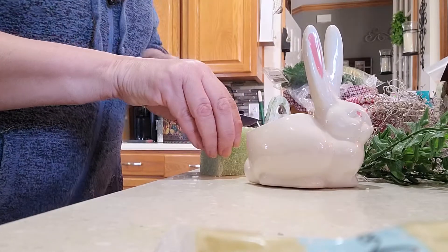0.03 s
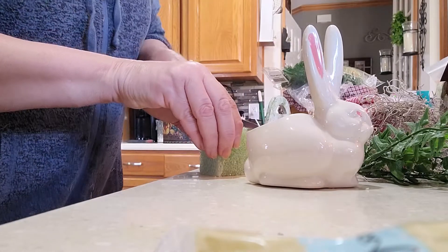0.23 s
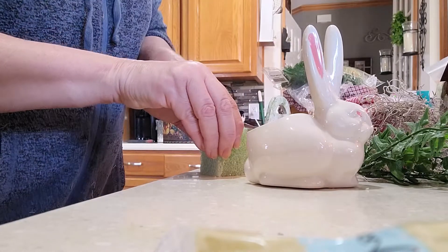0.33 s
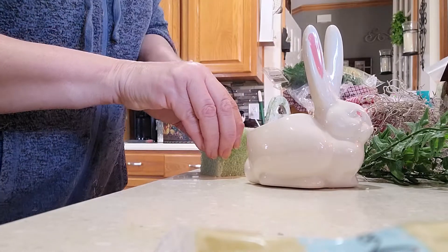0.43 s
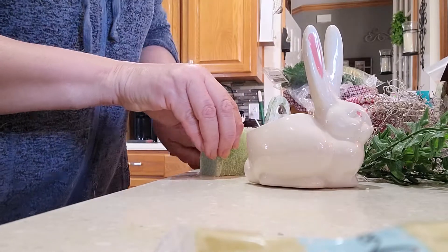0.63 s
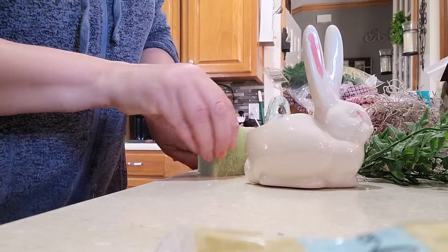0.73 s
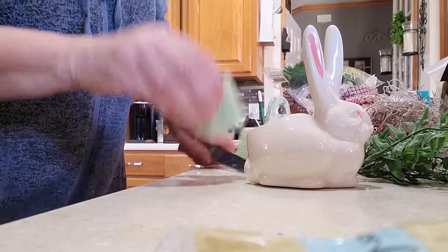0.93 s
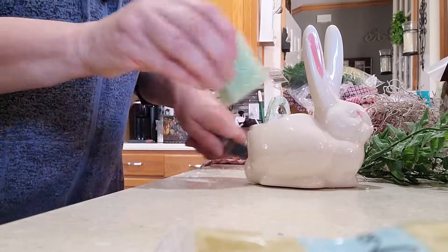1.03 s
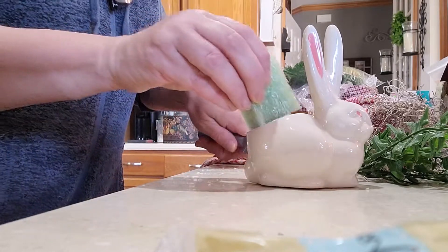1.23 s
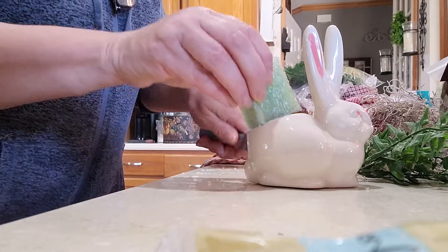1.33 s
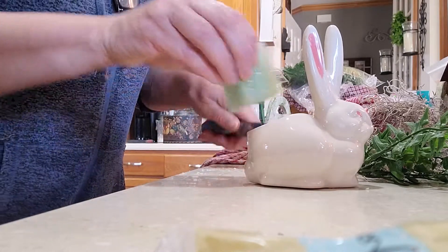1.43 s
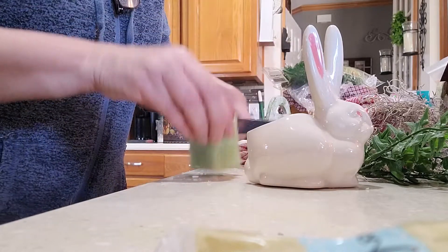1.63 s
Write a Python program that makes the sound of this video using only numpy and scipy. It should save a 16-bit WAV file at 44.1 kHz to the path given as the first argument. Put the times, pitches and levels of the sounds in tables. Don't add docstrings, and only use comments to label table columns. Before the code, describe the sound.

Dry floral foam is cut with a knife, crunching and snapping until the blade knocks the counter

```python
import sys
import numpy as np
from scipy import signal
from scipy.fft import rfft, irfft, next_fast_len
from scipy.io import wavfile

SR = 44100
rng = np.random.default_rng(int(sys.argv[2]) if len(sys.argv) > 2 else 0)


def magnitude_from_level(level_db):
    exponent = np.asarray(level_db, float) / 20
    return 10 ** exponent


def master_out(mix):
    frames = np.transpose(np.atleast_2d(mix))
    ceiling = np.clip(frames, -1, 1)
    pcm = np.round(ceiling * 32767).astype(np.int16)
    wavfile.write(sys.argv[1], SR, pcm)


N = 74970


def clock():
    return np.arange(N) / SR


def white(channels=2):
    return rng.standard_normal((channels, N))


def rms_one(x):
    return x / np.sqrt(np.mean(x ** 2) + 1e-20)


def passed(x, order, hz, kind):
    return signal.sosfilt(signal.butter(order, hz, kind, fs=SR, output="sos"), x)


def curve_db(rows):
    return np.interp(clock(), *np.transpose(rows))


def at_hz(points, hz):
    table_hz, table_db = np.transpose(points)
    return np.interp(np.log(hz + 1), np.log(table_hz), table_db)


def colour(x, spectrum):
    cepstrum = irfft(at_hz(spectrum, np.fft.rfftfreq(4096, 1 / SR)) * np.log(10) / 20)
    cepstrum[1:2048] *= 2
    cepstrum[2049:] = 0
    kernel = irfft(np.exp(rfft(cepstrum)))
    kernel = kernel / np.sqrt(np.sum(kernel ** 2))
    return signal.fftconvolve(x, kernel[None])[:, :N]


def drift(rate_hz):
    r = np.exp(-2 * np.pi * rate_hz / SR)
    chance = signal.lfilter([1], [1, -2 * r, r * r], rng.standard_normal(N + SR))
    return rms_one(chance[SR:])


def ring(force, hz, t60):
    r, w = magnitude_from_level(-60 / (t60 * SR)), 2 * np.pi * hz / SR
    return signal.lfilter([0, np.sin(w)], [1, -2 * r * np.cos(w), r * r], force + 1e-18)


def burst(s, db, rise, t60):
    t = np.maximum(clock() - s, 0)
    return magnitude_from_level(db - 60 * t / t60) * np.minimum(t / rise, 1)


def click(s, size):
    return size * (np.arange(N) == int(s * SR))


# frequency in Hz, level in dB per Hz.
AIR_SPECTRUM = [(30, -2.5), (100, -6.5), (450, -14), (700, -12), (1100, -20), (2000, -22.5), (3000, -39.5),
                (5000, -20.5), (16000, -25.5)]
# time in seconds, level in dB.
AIR_LEVEL = [(0, -63), (.04, -62.5), (.11, -62), (.2, -61.5), (.85, -59.5), (.93, -60.5), (.97, -71),
             (1.02, -68.5), (1.1, -64), (1.2, -65), (1.302, -71.5), (1.45, -66.5), (1.52, -66),
             (1.62, -71.5), (1.7, -81.5)]
# time in seconds, level in dB.
SLEEVE_LEVEL = [(0, -86), (.1, -88), (.9, -75), (1.0, -77.5), (1.1, -66.5), (1.2, -74.5), (1.239, -91),
                (1.5, -87.5), (1.56, -75), (1.62, -95), (1.7, -96.5)]
SLEEVE_BAND = [2000, 4173]
AIR_EDGES = [25, 150, 400, 800, 1400, 2200, 3300, 4800, 6500, 8500, 11000, 14000, 18000]
# frequency in Hz, level in dB.
DRONE = [(52, -72.5), (121, -76.5)]


def air():
    noise = white(3)
    mixed = noise[:2] + 0.36 * noise[2]
    patchy = 0
    for k, edges in enumerate(zip(AIR_EDGES, AIR_EDGES[1:])):
        patchy = patchy + passed(mixed, 2, edges, "band") * magnitude_from_level(6 * drift(9.2)) * (-1) ** k
    tone = colour(patchy, AIR_SPECTRUM) * magnitude_from_level(curve_db(AIR_LEVEL))
    cloth = rms_one(passed(white(), 2, SLEEVE_BAND, "band"))
    cloth = cloth * magnitude_from_level(curve_db(SLEEVE_LEVEL) + 1.2 * drift(40))
    hum_source = noise[:2] + 0.5 * noise[2]
    drone = sum(rms_one(ring(hum_source, hz, 0.9)) * magnitude_from_level(db) for hz, db in DRONE)
    return tone + cloth + drone


# time in seconds, level in dB.
RUMBLE_LEVEL = [(0, -54), (.2, -57.5), (.58, -41), (.8, -64.5), (0.949, -85), (1.4, -80), (1.55, -58.5),
                (1.7, -80)]
RUMBLE_BAND = [38, 70]


def rumble():
    noise = white(3)
    low = passed(noise[:2] + noise[2], 2, RUMBLE_BAND, "band")
    return rms_one(low) * magnitude_from_level(curve_db(RUMBLE_LEVEL))


def kitchen(x):
    t60, wall_cut_hz = 0.21, 4160
    size = next_fast_len(N + SR)
    hz = np.fft.rfftfreq(size, 1 / SR)
    response = np.zeros((2, size // 2 + 1), complex)
    for k, lag in enumerate(rng.uniform(.004, .03, 16)):
        loop = magnitude_from_level(-60 * lag / t60) * np.exp(-2j * np.pi * hz * lag) / (1 + 1j * hz / wall_cut_hz)
        response[k % 2] += loop / (1 - loop) * (-1) ** (k // 2)
    return irfft(response * rfft(x, size), size)[:, :N]


def ports(pair, balance, lead_s):
    unlike_high, unlike_low, corner_hz = 0.47, 0.22, 2980
    hz = np.fft.rfftfreq(N, 1 / SR)
    share = np.clip((unlike_high * hz + unlike_low * corner_hz) / (hz + corner_hz), 0, 1)
    same, other = rfft(pair[0]) * np.sqrt(1 - share), rfft(pair[1]) * np.sqrt(share)
    tilt = magnitude_from_level(at_hz(balance, hz) / 2) * np.exp(1j * np.pi * hz * lead_s)
    return irfft([(same + other) * tilt, (same - other) / tilt], N)


# start in seconds, peak level in dB.
TICKS = [(0.0222, -41), (0.7256, -33), (0.7298, -33.5), (0.732, -35.5), (0.738, -39), (0.7404, -32),
         (0.7775, -33.5), (0.827, -49), (0.848, -50), (0.863, -36.5), (0.9694, -52.5)]
# start in seconds, peak level in dB.
CRUMBS = [(1.1615, -58), (1.1824, -52), (1.3042, -57), (1.3389, -72), (1.3558, -52), (1.369, -56.5),
          (1.425, -53), (1.443, -58), (1.47, -47), (1.5547, -46), (1.5994, -55), (1.679, -68)]
# frequency in Hz, level in dB per Hz.
TICK_SPECTRUM = [(470, -23.5), (800, -15), (2070, -5), (2950, -7), (9940, -6.5), (11000, -6), (16000, -8.5)]


def ticks():
    noise = white()
    cracks = noise * sum(burst(s, db + 1, 0.00027, 0.02) for s, db in TICKS)
    crumbs = noise * sum(burst(s, db + 1, 0.00027, 0.02) for s, db in CRUMBS)
    return colour(cracks, TICK_SPECTRUM) + passed(crumbs, 3, 4800, "high")


# frequency in Hz, level in dB, decay time t60 in seconds.
BLADE_MODES = [(727, -8, .04), (950, -9, .025), (1750, -25, .3), (2610, -2, .035), (2972, -2, .035),
               (4250, -17, .1), (4545, -3, .04), (6000, -9, .03), (6630, -11, .04), (7775, -13, .05),
               (9300, -18, .04), (11490, -2, .04), (12900, -14, .03), (14200, -10, .03)]


def brush():
    start, rise, fall, flick = 1.028, 0.02, 0.034, 1.0745
    t = clock() - start
    swell = np.minimum(t / rise, 1 - 0.85 * (t - rise) / fall)
    swell = np.clip(swell, 0, 1) ** 2 * (t < rise + fall)
    rub = white() * swell * magnitude_from_level(drift(75.4)) + click(flick, magnitude_from_level(7))
    rings = 0
    for k, (hz, db, t60) in enumerate(BLADE_MODES):
        rings = rings + ring(rub, hz, t60) * magnitude_from_level(db - 61.5) * (-1) ** k
    rings = rings + ring(rub * (clock() > 1.058), 4300, 0.021) * magnitude_from_level(-64)
    rings = rings + ring(click(flick, magnitude_from_level(-40.5)), 1720, .03)
    hiss = passed(rub, 2, 2500, "high") * magnitude_from_level(-45.5)
    return passed(rings + hiss, 4, 640, "high")


# start in seconds, peak level in dB.
TAPS = [(1.339, -46.5), (1.3558, -35), (1.3695, -34.5), (1.397, -30), (1.4184, -15.5), (1.4208, -24),
        (1.4264, -21.5), (1.431, -32), (1.444, -14.5), (1.451, -49), (1.4944, -24.5), (1.501, -22),
        (1.509, -21), (1.515, -47), (1.54, -32.5), (1.545, -31.5), (1.55, -35), (1.57, -39), (1.587, -44.5)]
# frequency in Hz, level in dB, decay time t60 in seconds.
VASE_MODES = [(214.7, -21, 0.25), (269.4, -9.5, 0.15), (304, -31, 0.13), (361, -5, 0.18),
              (506.4, -3.5, 0.09), (692, 3.5, 0.097), (904, 1, 0.034), (1228, 0, 0.032), (1665, 3.5, 0.025),
              (2310, -1.5, 0.13)]
# start in seconds, peak level in dB, frequency in Hz.
SIGHS = [
    (1.565, -38.5, 267),
    (1.586, -41, 261),
    (1.607, -43, 238),
    (1.629, -54.5, 225),
]


def vase():
    top_hz = 2900
    luck_db = rng.normal(0, 3, (len(TAPS), len(VASE_MODES)))
    side = .35 * rng.standard_normal(len(VASE_MODES))
    rattle = white() * sum(burst(s, db - 18, 0.00077, .05) for s, db in TAPS)
    out = passed(rattle, 3, 900, "low") * 4
    for s, db, hz in SIGHS:
        hum = burst(s, db, 0.0031, 0.082) * np.sin(2 * np.pi * hz * (clock() - s))
        out = out + hum * [[1], [.3]]
    for i, (s, db) in enumerate(TAPS):
        contact_s = 0.00025 * magnitude_from_level(-0.28 * (db + 28))
        t = np.maximum(clock() - s, 0) / contact_s
        push = -magnitude_from_level(db) * t ** 2 * np.exp(2 - 2 * t)
        rings = 0
        for k, (hz, level_db, t60) in enumerate(VASE_MODES):
            rings = rings + ring(push, hz, t60) * magnitude_from_level(level_db + luck_db[i, k]) * [[1], [side[k]]]
        out = out + magnitude_from_level(-3) * push * [[1], [0]] + magnitude_from_level(-19) * rings / (contact_s * SR * 2)
    return passed(passed(out, 3, top_hz, "low"), 2, [200, top_hz], "band")


# time in seconds, level in dB.
PRESSURE = [(0, -64), (0.118, -80.5), (0.126, -48), (0.2, -61), (0.204, -38), (.25, -34), (.3, -32),
            (0.341, -35), (.368, -39), (.378, -26.5), (0.441, -32), (0.464, -33.5), (0.48, -38),
            (0.484, -26), (.56, -24), (.6, -33.5), (0.651, -38.5), (0.748, -50), (0.799, -58.5),
            (0.928, -66.5)]


def pressure_db():
    s, db = np.transpose(PRESSURE)
    return np.interp(clock(), [*s, s[-1] + 0.028], [*db, db[-1] - 31])


# start in seconds, peak level in dB.
LANDING = [
    (.5647, -4.5),
    (.5656, -15),
    (.5674, -24),
    (.5691, -15.5),
    (.5724, -21),
]
# frequency in Hz, level in dB, decay time t60 in seconds.
COUNTER_MODES = [(80, -36, .2), (126, -27, .15), (246, -25, .1), (378, -29, .06), (690, -11, .04),
                 (800, -12, .03), (965, -8, .03), (1068, -9, .025), (1209, -3, .028), (1383, -2, .025),
                 (1660, -2, .025), (3490, 0, .015), (4600, 3, .015)]


def counter():
    luck_db = rng.normal(0, 1.8, (len(LANDING), len(COUNTER_MODES)))
    hit = 0
    for k, (hz, level_db, t60) in enumerate(COUNTER_MODES):
        blows = sum(click(s, magnitude_from_level(db + level_db + luck_db[i, k])) for i, (s, db) in enumerate(LANDING))
        pan = np.array([[1], [hz / 3500 - .5]])
        hit = hit + ring(blows, hz, min(t60, 30 / hz)) * (-1) ** k * pan
    shake = rms_one(passed(white(), 2, [70, 189], "band")) * [[1], [1.3]]
    return hit + shake * magnitude_from_level(-17 + 0.88 * pressure_db() + 3 * drift(60))


# frequency in
# Hz, level in dB, decay time t60 in seconds.
BODY_MODES = [(244.2, -39.5, 0.081), (361.7, -40.5, .05), (1250, -39.5, 0.069), (1670, -39, 0.092),
              (1950, -34, .015), (2350, -34.5, 0.059), (2670, -35, .035), (2887, -30, .025)]


def block(force, count):
    modes = enumerate(BODY_MODES[:count])
    return sum(ring(force, hz, t60) * magnitude_from_level(db) * (-1) ** k for k, (hz, db, t60) in modes)


# start in seconds, peak level in dB, body frequency in Hz.
SNAPS = [(0.0237, -34.5, 1510), (0.125, -15.5, 1460), (0.1333, -23, 2100), (0.181, -31.5, 2900),
         (0.2053, -27.5, 2300), (0.2079, -15.5, 2030), (0.2315, -16, 1960), (0.2344, -11, 2000),
         (0.261, -14, 2410), (0.2775, -11.5, 1796), (0.2975, -23.5, 2600), (0.3082, -12, 2350),
         (0.32, -26.5, 2500), (0.352, -26.5, 3300), (0.3738, -15.5, 2100), (0.3762, -13.5, 2750),
         (0.3843, -10, 2340), (0.389, -16, 1500), (0.3964, -8.5, 2600), (0.4071, -18, 2420),
         (0.4183, -19, 2500), (0.4255, -24.5, 2800), (0.43, -7, 2700), (0.44, -16, 2500),
         (0.4821, -6.5, 2040), (0.4845, -10, 1770), (0.4981, -11.5, 1900), (0.5082, -8.5, 2440),
         (0.5194, -14.5, 2000), (0.5214, -8, 2700), (0.528, -10.5, 2100), (0.554, -16, 4300),
         (0.6553, -24.5, 2980), (0.662, -11, 1670), (0.6636, -14, 3900), (.673, -21, 1458)]
# frequency in Hz, level in dB per Hz.
SNAP_SPECTRUM = [(240, -43), (400, -8), (719, -7.5), (2220, 1.5), (6340, -4.5), (7870, 2), (9040, -15),
                 (11200, -2.5), (16000, -10.5)]


def snaps():
    rise = .0003
    noise = white()
    out = noise * burst(.5595, -8, .005, .045)
    for s, db, hz in SNAPS:
        spray = noise * burst(s, 0, rise, 0.011) + click(s + rise, 2.5) * [[1], [.3]]
        spray = spray * magnitude_from_level(db - 4) / np.abs(spray).max(axis=1, keepdims=True) * 2
        out = out + spray + magnitude_from_level(-5.5) * ring(spray, hz, .008) * 0.16
    jolts = sum(click(s, magnitude_from_level(db + 16.5)) for s, db, hz in SNAPS[1:-2])
    return colour(out, SNAP_SPECTRUM) + block(jolts, count=2) * [[1], [.4]]


# frequency in Hz, level in dB per Hz.
CRUSH_SPECTRUM = [(88, -40.5), (150, -14), (244, -7), (649, -13), (2310, -0.5), (3770, -4.5), (5500, -9),
                  (7620, -10), (16000, -10.5)]
CLUMP_EDGES = [100, 1200, 3800, 6500, 9500, 17000]


def crush():
    cells_per_s, spread_db, flicker_db, clump_db = 9000, 4, 1.5, 4.5
    sizes = magnitude_from_level(spread_db * np.minimum(rng.exponential(1, (2, N)), 5))
    sizes = sizes * rng.choice([-1, 1], (2, N))
    cells = rms_one(sizes * (rng.random((2, N)) < cells_per_s / SR))
    cells = cells * magnitude_from_level(pressure_db() + flicker_db * drift(150))
    clumps = 0
    for k, edges in enumerate(zip(CLUMP_EDGES, CLUMP_EDGES[1:])):
        clumps = clumps + passed(cells * magnitude_from_level(clump_db * drift(43)), 2, edges, "band") * (-1) ** k
    return colour(clumps, CRUSH_SPECTRUM) + block(clumps, count=8)


# frequency in Hz, level in dB.
FOAM_BALANCE = [(60, 0), (130, -4), (290, -3), (640, -4), (1410, -5), (3100, 2.5), (6820, 4), (15000, 10)]
# frequency in Hz, level in dB.
VASE_BALANCE = [(100, -8), (700, -3.5), (2400, -4.5)]


def scene():
    foam = crush() + snaps() + ticks() + counter() + brush()
    taps = vase()
    wet = kitchen(magnitude_from_level(-17) * foam[0] + magnitude_from_level(-19) * taps[0])
    direct = ports(foam, FOAM_BALANCE, 0.00012) + ports(taps, VASE_BALANCE, .00008)
    return direct + wet + air() + rumble()


def band_limit(x):
    return signal.sosfilt(signal.butter(12, 17160, fs=SR, output="sos"), x)


def record(dry):
    top_cut = signal.cheby2(16, 100, 17200, fs=SR, output="sos")
    mix = signal.sosfilt(top_cut, np.tanh(dry))
    mix = passed(mix, 4, 32, "high")
    return band_limit(mix)


dry = scene()
out = record(dry)
master_out(out)
```